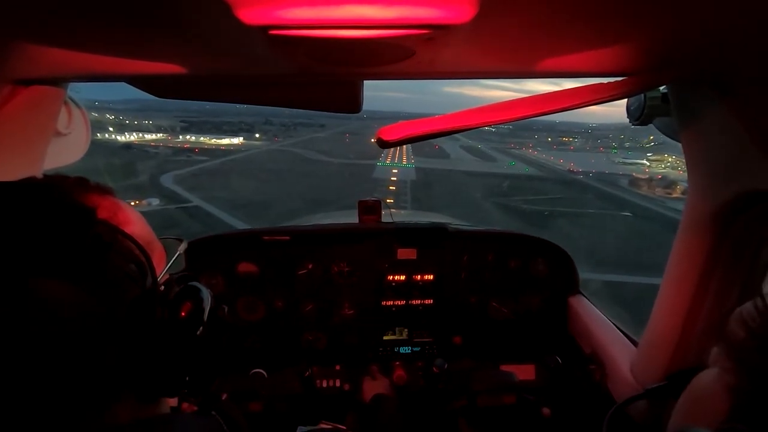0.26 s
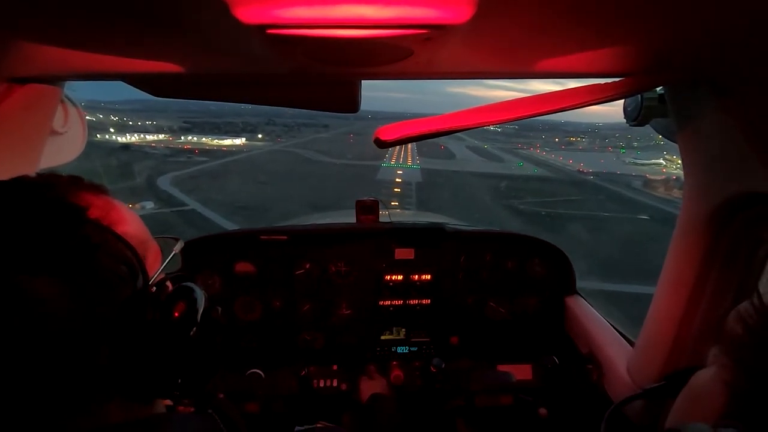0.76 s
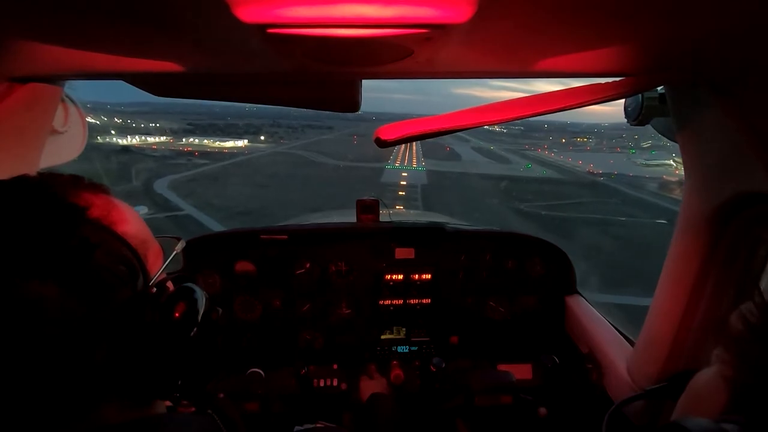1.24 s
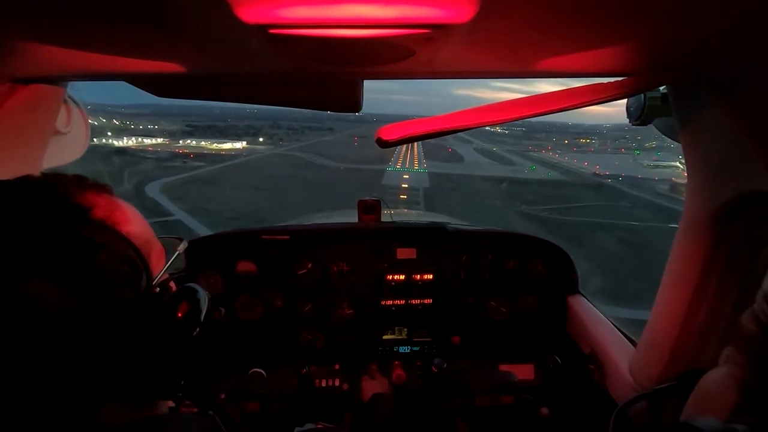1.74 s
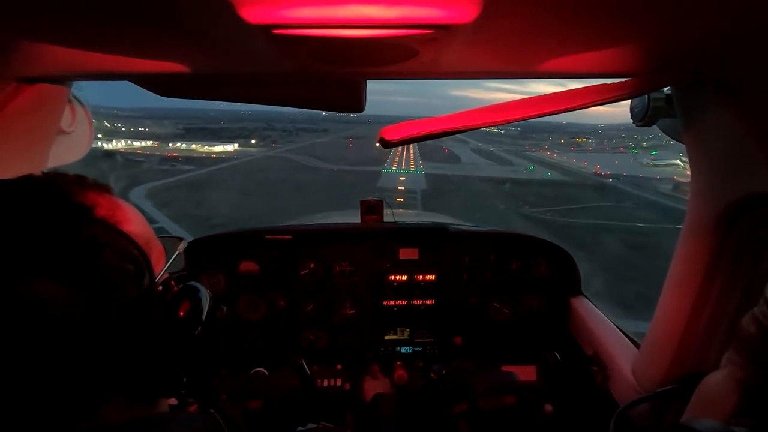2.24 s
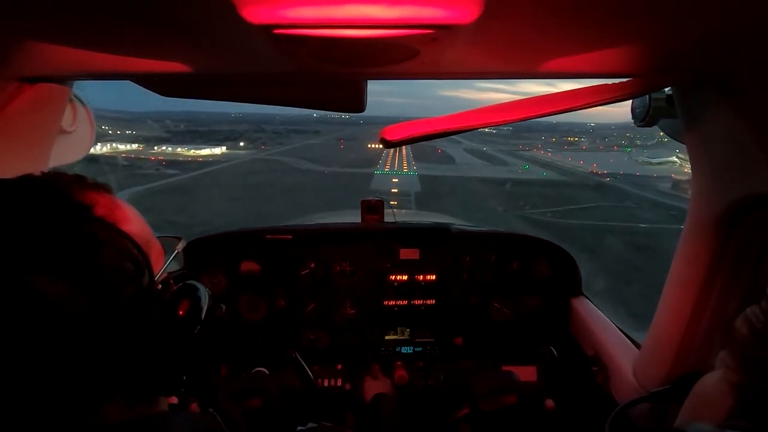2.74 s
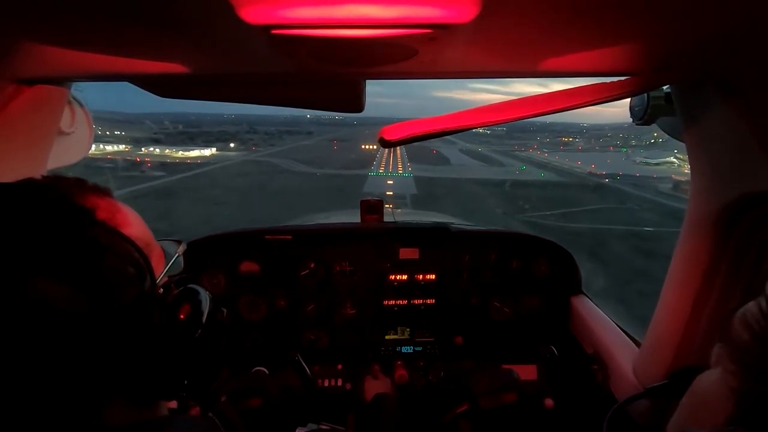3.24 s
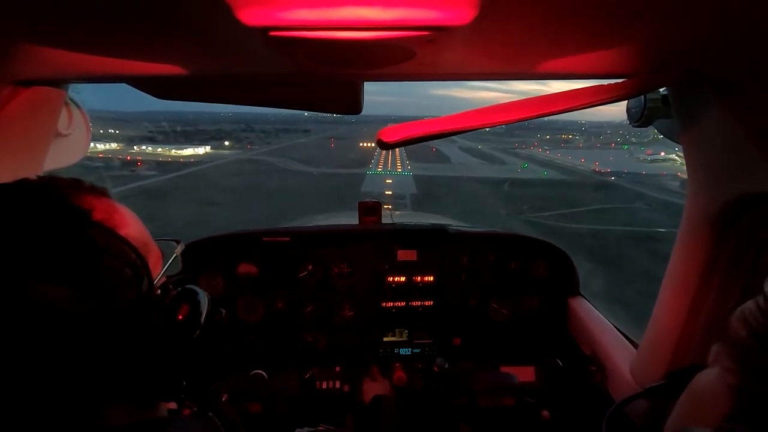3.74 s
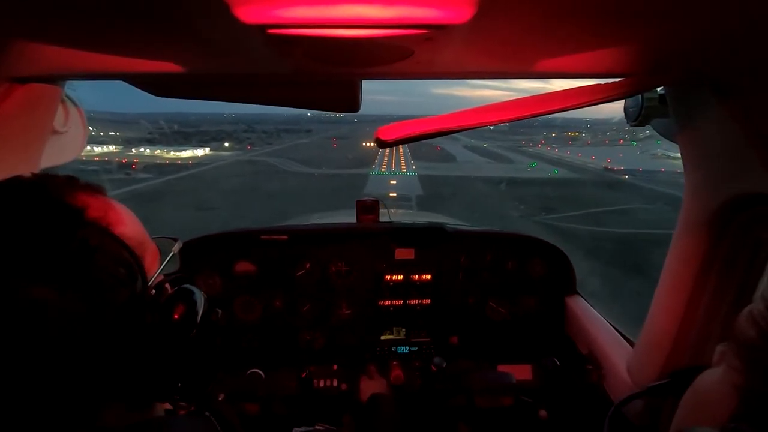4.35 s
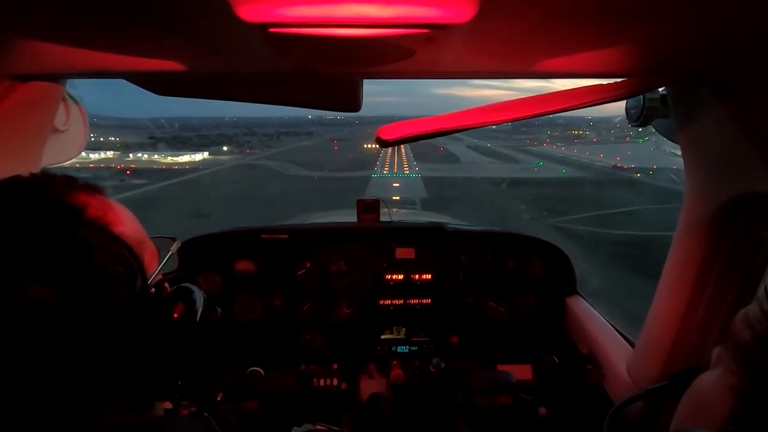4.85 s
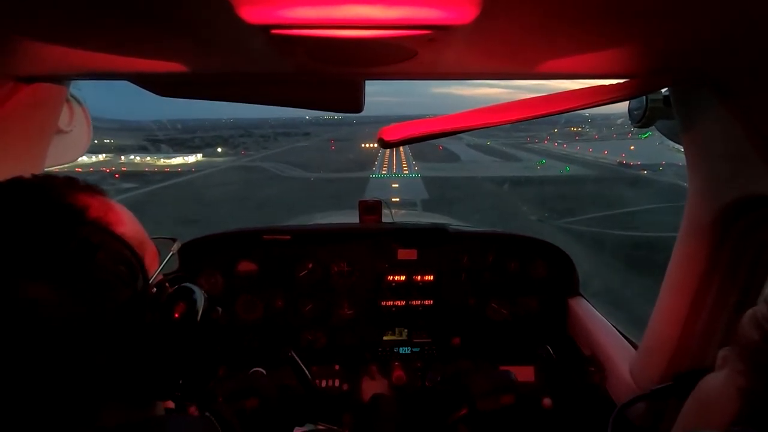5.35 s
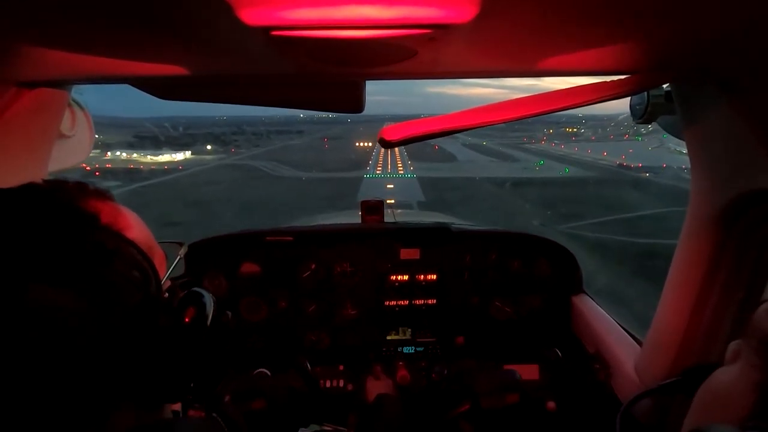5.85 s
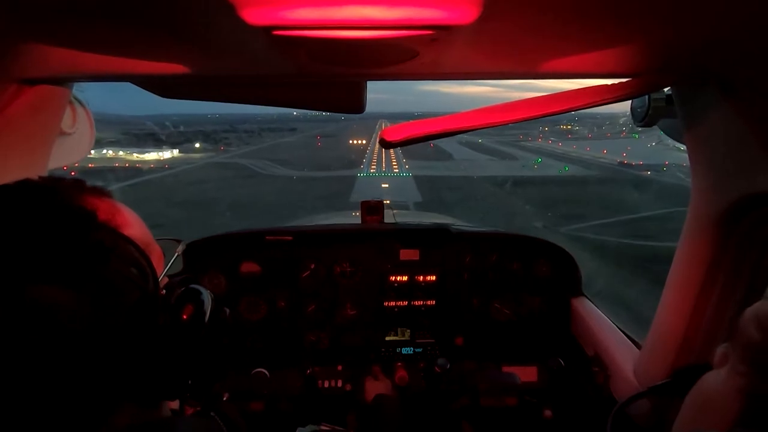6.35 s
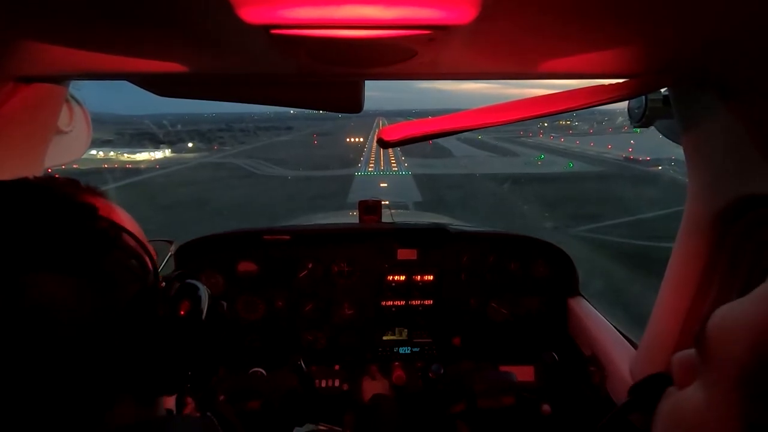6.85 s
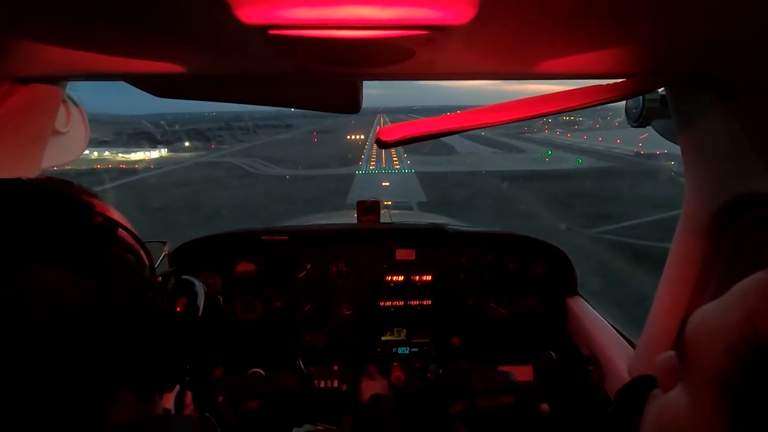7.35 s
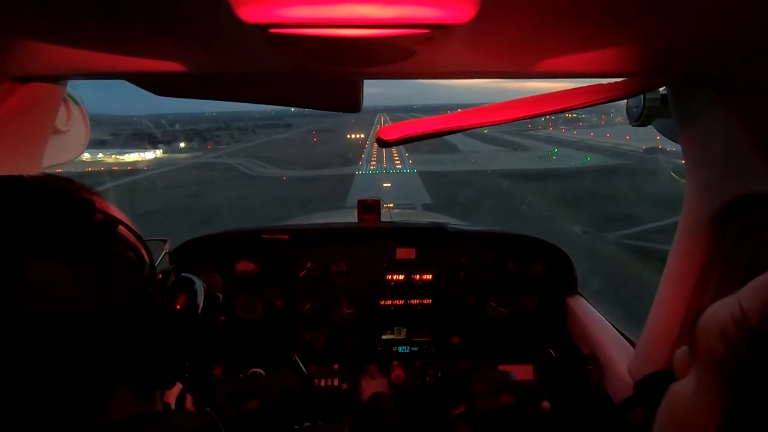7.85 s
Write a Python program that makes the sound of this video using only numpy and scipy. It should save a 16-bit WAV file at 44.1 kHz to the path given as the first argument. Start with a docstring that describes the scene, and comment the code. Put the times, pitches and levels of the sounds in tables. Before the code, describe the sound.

Low, throbbing piston-engine and propeller hum fills a light aircraft cabin, with airflow roar, rattling clatter and resonant panels, gradually slowing a little.

```python
"""Inside the cabin of a light four-cylinder aeroplane on a gentle descent, heard by a small stereo camera.
Firings and the two-blade propeller open as one stack of low tones near 43.7 Hz, weak tones of uneven cylinders
and a gear between them; clatter repeats every engine cycle, air rushes over the skin, gyros whine faintly.
Panels rung by the air, mostly near 890 Hz, swell and fade; from about 2.5 s the engine eases down.
Panel noise near 533 Hz is louder about 7.2 s, and the engine reaches 42 Hz near 8 s."""
import sys
import numpy as np
from scipy import signal
from scipy.fft import rfft, irfft, next_fast_len
from scipy.io import wavfile

SR = 44100
rng = np.random.default_rng(int(sys.argv[2]) if len(sys.argv) > 2 else 0)


def digitize_waveform(pressure):
    """Quantize a signal to 16-bit integers and store it at the path in sys.argv[1].

    Rows of a 2-D input are taken as channels; values are limited to [-1, 1].
    """
    field = np.atleast_2d(pressure).T
    bounded = np.clip(field, -1, 1)
    quanta = np.round(bounded * 32767).astype(np.int16)
    wavfile.write(sys.argv[1], SR, quanta)


N = 357210


def undb(db):
    """Decibels to amplitude."""
    return 10 ** (np.asarray(db) / 20)


def walk(rate):
    """Random levels, rate a second, slewed between; spread near 1."""
    knots = rng.standard_normal(int(N / SR * rate) + 2)
    return 1.2 * np.interp(np.arange(N) * (rate / SR), np.arange(len(knots)), knots)


def on_log(hz, table, column):
    """A table column joined by straight lines over log frequency."""
    table = np.asarray(table, float)
    return np.interp(np.log(hz + 1), np.log(table[:, 0]), table[:, column])


# stereo tie: sources off centre link the opposite part to the common one
# (pitch [Hz], share in step [0-1, signed], share a quarter cycle ahead [0-1, signed])
STEREO_TIE = [(60, -.2, -.4), (250, -.3, 0), (350, .2, -.15), (530, -.45, -.6), (800, -.6, -.2),
              (890, .2, -.25), (1000, -.35, .15), (1320, -.05, .2), (1500, -.35, .15), (2200, -.25, -.1),
              (3900, 0, .2), (5700, -.25, -.25), (7800, -.15, -.15), (9500, .2, -.05), (13000, 0, 0)]


def tie_opposite(common, own, hz):
    """Sources off centre: the opposite part is partly the common one, turned in phase, and partly its own."""
    tie = on_log(hz, STEREO_TIE, 1) + 1j * on_log(hz, STEREO_TIE, 2)
    return tie * common + np.sqrt(1 - abs(tie) ** 2) * own


def noise(mid_gain, side_gain, hz):
    """Left and right noise from a common and an opposite part, gains as root power per Hz."""
    size = 2 * (len(hz) - 1)
    used = np.flatnonzero(mid_gain + side_gain)
    real, imaginary = rng.standard_normal((2, 2, len(used)))
    common, own = real + 1j * imaginary
    mid = common * mid_gain[used]
    side = tie_opposite(common, own, hz[used]) * side_gain[used]
    spectra = np.zeros((2, len(hz)), complex)
    spectra[0, used] = mid + side
    spectra[1, used] = mid - side
    return irfft(spectra, size)[:, :N] * np.sqrt(size * SR) / 2


# instrument gyros: (pitch [Hz], level [dB])
GYRO_WHINES = [(2387, -60), (4694, -70), (4783, -70), (6808, -71)]


def gyros():
    """Spinning instrument gyros: thin whines, drifting by a few Hz and wavering in level."""
    out = 0
    for tone_hz, db in GYRO_WHINES:
        angle = 2 * np.pi * np.cumsum(tone_hz + 2.48 * walk(.7)) / SR
        out = out + undb(db + 3.6 * walk(1.7)) * np.sqrt(2) * np.sin(angle)
    return out


# airframe rumble: (pitch [Hz], common part [dB per Hz re airflow], opposite part [dB per Hz re airflow])
AIRFRAME_RUMBLE = [(10, -38, -51), (25, -28, -45), (40, -23, -34), (60, -20, -41), (72, -20, -38),
                   (80, -19, -39), (93, -19.5, -41), (112, -19.5, -46), (137, -24, -44), (150, -23, -45),
                   (162, -27, -44), (185, -26, -44), (206, -22.5, -44), (228, -24.5, -44), (265, -27, -43)]
# rush of air over the skin: (pitch [Hz], common part [dB per Hz re airflow], opposite part [same])
AIR_RUSH = [(415, -32.5, -46), (645, -33.5, -44), (937, -39, -44.5), (1250, -42, -48), (1700, -43, -44.5),
            (2950, -44, -50), (3080, -45, -51), (3680, -46.5, -53), (3890, -50, -56.5),
            (5320, -55.5, -55.5), (6250, -58.5, -58), (7870, -59.5, -58), (8840, -66.5, -65.5),
            (9880, -69, -67), (10600, -77.5, -78), (14000, -86.5, -87), (16000, -104, -104)]
AIR_NOISE = AIRFRAME_RUMBLE + AIR_RUSH  # one curve from rumble to hiss


def rush(turn, hz):
    """Octave bands of air noise that drift alone; the middle ones throb with propeller wash and engine cycle."""
    mid = undb(on_log(hz, AIR_NOISE, 1))
    side = undb(on_log(hz, AIR_NOISE, 2))
    octave = np.clip(np.log2(hz + 1), 6, 13)
    throb = 1 + .07 * np.cos(turn) + .06 * np.cos(turn / 4)  # propeller wash, engine cycle
    out = 0
    for centre in range(6, 14):  # powers of two: 64 Hz to 8 kHz
        distance = octave - centre
        share = np.where(abs(distance) < 1, np.cos(np.pi / 2 * distance), 0)
        drift_db = 0.22 * walk(2.4) + 0.4 * walk(12)
        band = noise(mid * share, side * share, hz) * undb(drift_db)
        out = out + band * (throb if 8 < centre < 12 else 1)
    return out


def panel_gain(hz, rows, column):
    """Root power per Hz of steep panel resonances, their powers added."""
    power = 0
    for row in rows:
        detune = 2 * (hz - row[0]) / row[1]
        power = power + undb(2 * row[column]) / (1 + .5 * detune ** 2) ** 2
    return np.sqrt(power)


# panels and cavities rung by the airflow:
# (pitch [Hz], width [Hz], common peak [dB per Hz re airflow], opposite peak [dB per Hz re airflow])
CABIN_PANELS = [(319, 15, -29, -52), (346, 42.6, -28.5, -53.5), (532, 17, -27.5, -33.5),
                (576, 58, -34.5, -42), (674, 10, -38.5, -27.5), (718, 65, -30, -34.5), (814, 34, -33, -31),
                (849.4, 27, -29, -32), (872, 18, -29, -32), (900.5, 22.7, -28, -31), (955, 50, -45.5, -45),
                (985, 49, -37.5, -38.5), (1060, 36, -45, -38.5), (1149, 60, -37.5, -40),
                (1274, 50, -43.5, -39.5), (1330, 90, -47, -39.5), (1392, 47, -39.5, -37),
                (1570, 21, -39.5, -50), (3220, 46, -50, -59), (3340, 80, -49.5, -57),
                (3640, 170, -55.5, -60), (4300, 200, -55, -60), (4720, 200, -59.5, -63)]
# neighbouring panels swell together: (lowest pitch [Hz], highest pitch [Hz], random swell [dB])
SWELL_GROUPS = [(300, 450, .7), (450, 620, .7), (620, 790, .7), (790, 960, 1.0), (960, 5000, .3)]
# hand-set rises in the wavering noise level of one group: (time [s], pitch [Hz], length [s], gain [dB])
LEVEL_RISES = [(.35, 890, .3, 2.5), (2.3, 720, .3, 2.5), (3.45, 890, .3, 2.5), (4.3, 880, .25, 2.5),
               (5.33, 890, .15, 3.5), (7.2, 533, .6, 5)]


def panels(hz):
    """Panels rung by the airflow: noise in steep resonances, groups swelling at random, plus hand-set rises."""
    t = np.arange(N) / SR
    out = 0
    for low, high, swell_db in SWELL_GROUPS:
        rows = [row for row in CABIN_PANELS if low <= row[0] < high]
        level_db = swell_db * walk(4.1)
        for time, pitch, length, gain_db in LEVEL_RISES:
            if low <= pitch < high:
                level_db = level_db + gain_db * np.exp(-(2 * (t - time) / length) ** 2)
        ringing = noise(panel_gain(hz, rows, 2), panel_gain(hz, rows, 3), hz)
        out = out + ringing * undb(level_db)
    return out


MID_HZ = 43  # reference firing rate

# valve and exhaust clatter: (pitch [Hz], level [dB re the air noise at that pitch])
CLATTER_LEVELS = [(130, -16), (300, -11), (450, -6), (650, -8), (800, -6.5), (1000, -10), (1300, -18),
                  (2000, -40)]


def clatter(turn, hz):
    """Valves and exhaust: one random engine cycle (four firings) repeats, its tones sliding through the panels."""
    size = 2 * (len(hz) - 1)
    points, harmonics = 4096, 200  # per engine cycle
    phases = np.exp(2j * np.pi * rng.random((2, points // 2 + 1)))
    cycles = irfft(phases * (np.arange(points // 2 + 1) < harmonics))
    place = turn / (8 * np.pi) % 1 * points
    common, own = (rfft(np.interp(place, np.arange(points), cycle / cycle.std(), period=points), size)
                   for cycle in cycles)
    # the harmonics share unit power, so lift them to unit power per Hz first
    flat = np.sqrt(harmonics * MID_HZ / 4) * undb(on_log(hz, CLATTER_LEVELS, 1))
    mid_gain, side_gain = (flat * np.hypot(undb(on_log(hz, AIR_NOISE, part)),
                                           panel_gain(hz, CABIN_PANELS, part + 1)) for part in (1, 2))
    mid = common * mid_gain
    side = tie_opposite(common, own, hz) * side_gain
    return irfft([mid + side, mid - side], size)[:, :N] * undb(1.1 * walk(3))


# loud tones: (multiples of the firing rate)
LOUD_MULTIPLES = (.75, 1, 2, 3, 4, 5)
# each loud tone slides along the cabin's response as the engine slows:
# (level at MID_HZ [dB], slope [dB per Hz of firing rate], bend [dB per Hz squared], waver [dB])
LOUD_LEVELS = [(-31, 1.8, -4.5, 1.3), (-20.7, -1.9, 0, .6), (-25, -.4, 1, .6), (-21.7, .3, .2, .3),
               (-31.8, 4.6, -1.2, .6), (-39, -3, 6.5, 1.4)]
# part of each loud tone opposite between the ears: (in step [ratio], a quarter cycle ahead [ratio])
LOUD_OPPOSITE = [(-.12, -.12), (-.02, -.14), (-.02, -.05), (-.03, -.01), (-.03, .04), (-.06, -.01)]
# the firing-rate tone sits near a cabin resonance and runs ahead:
# (lead at MID_HZ [rad], slope [rad per Hz], bend [rad per Hz squared])
FIRING_LEAD = (.25, -.15, .3)
# weak tones of uneven cylinders: {multiple of the firing rate: level [dB]}
WEAK_TONES = {1.25: -42, 1.5: -39, 1.75: -39, 2.25: -40, 2.5: -44, 2.75: -39, 3.25: -46, 4.5: -43, 4.75:
              -43, 8: -41, 13: -46, 17.25: -47, 17.5: -47, 19.25: -47.5, 19.5: -45}
SWEEP = 0.82  # radians of phase offset, times the square of the multiple
GEAR_ORDER, GEAR_DB, GEAR_DB_PER_HZ = 10.75, -43.5, 7  # multiple, level at the start, fall per Hz of slowing


def engine(turn, firing_hz):
    """Firings, propeller and gear: clean tones locked to the crank, each wavering in level."""
    off_hz = firing_hz - MID_HZ
    out = 0
    for order, levels, (in_step, ahead) in zip(LOUD_MULTIPLES, LOUD_LEVELS, LOUD_OPPOSITE):
        db, slope, bend, waver_db = levels
        level_db = db + slope * off_hz + bend * off_hz ** 2 + waver_db * walk(2.5)
        angle = order * turn + SWEEP * order ** 2
        if order == 1:
            angle = angle + np.polyval(FIRING_LEAD[::-1], off_hz)
        side = in_step * np.cos(angle) - ahead * np.sin(angle)
        tone = np.cos(angle) + side * np.array([[1], [-1]])
        out = out - undb(level_db) * np.sqrt(2) * tone  # minus: the stack is flipped in polarity
    for order, db in WEAK_TONES.items():
        tone = np.cos(order * turn + 2 * np.pi * rng.random())
        out = out + undb(db + 2 * walk(2.96)) * np.sqrt(2) * tone
    gear_db = GEAR_DB + GEAR_DB_PER_HZ * (firing_hz - firing_hz[0])
    return out + undb(gear_db + 2.2 * walk(3.9)) * np.sqrt(2) * np.cos(GEAR_ORDER * turn)


# the descent: (time [s], firing rate [Hz], airflow level [dB])
DESCENT = [(0.0, 43.65, -25.8), (0.8, 43.63, -25.9), (2.0, 43.8, -25.0), (2.4, 43.73, -25.0),
           (3.1, 43.45, -25.6), (3.6, 43.48, -25.3), (4.8, 43.32, -25.5), (5.6, 42.86, -26.1),
           (6.0, 42.83, -26.0), (6.4, 42.53, -25.8), (7.6, 42.0, -26.3), (8.1, 41.97, -26.5)]


def scene():
    """Gyros, airflow with its panels, clatter and engine tones; the airflow level also carries the clatter."""
    time, *columns = np.transpose(DESCENT)
    firing_hz, air_db = (np.interp(np.arange(N) / SR, time, column) for column in columns)
    turn = 2 * np.pi * np.cumsum(firing_hz) / SR  # one full circle a firing
    hz = np.fft.rfftfreq(2 * next_fast_len(N // 2 + 1), 1 / SR)
    air = undb(air_db) * (rush(turn, hz) + panels(hz) + clatter(turn, hz))
    return gyros() + air + engine(turn, firing_hz)


KNEE, HEADROOM = .21, .3  # amplitude where rounding starts, most that can pass above it
TOP_HZ = 15100


def record(dry):
    """The microphone rounds pressure peaks above a knee, on the pushing side only; the camera cuts the top."""
    above = np.maximum(dry - KNEE, 0)
    rounded = np.minimum(dry, KNEE) + HEADROOM * np.tanh(above / HEADROOM)
    top_cut = signal.ellip(10, .2, 60, TOP_HZ, fs=SR, output="sos")
    return signal.sosfilt(top_cut, 1.025 * rounded)


dry = scene()
out = record(dry)
digitize_waveform(out)
```